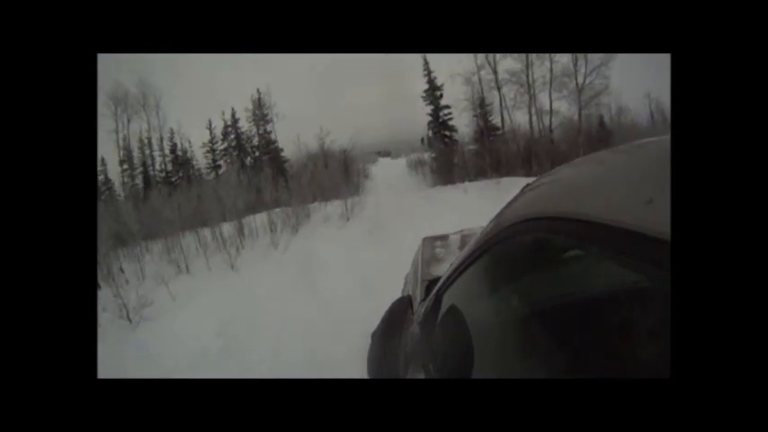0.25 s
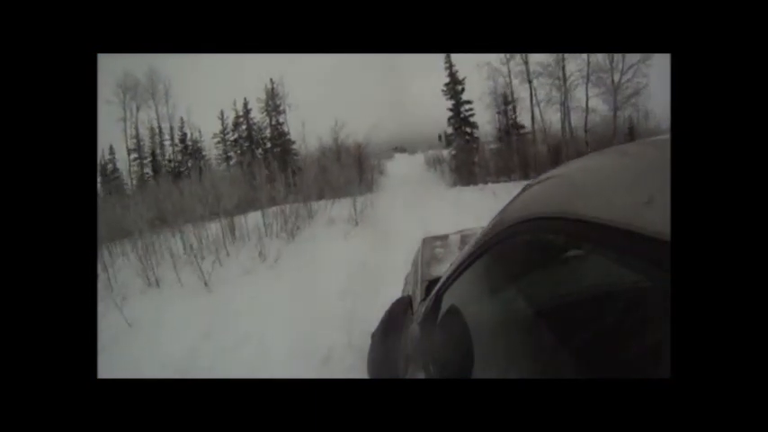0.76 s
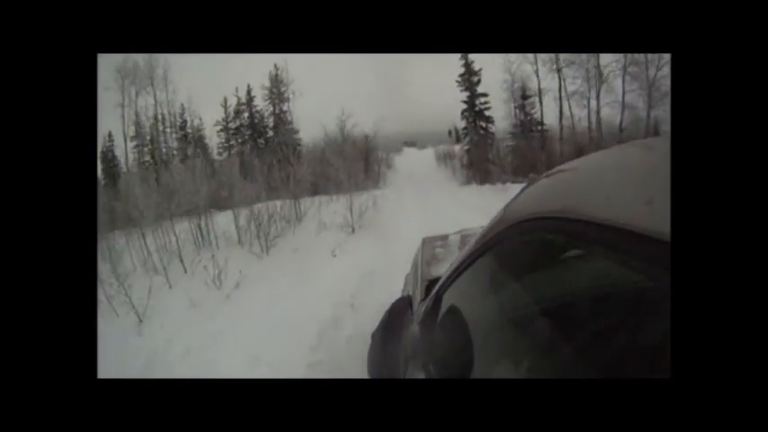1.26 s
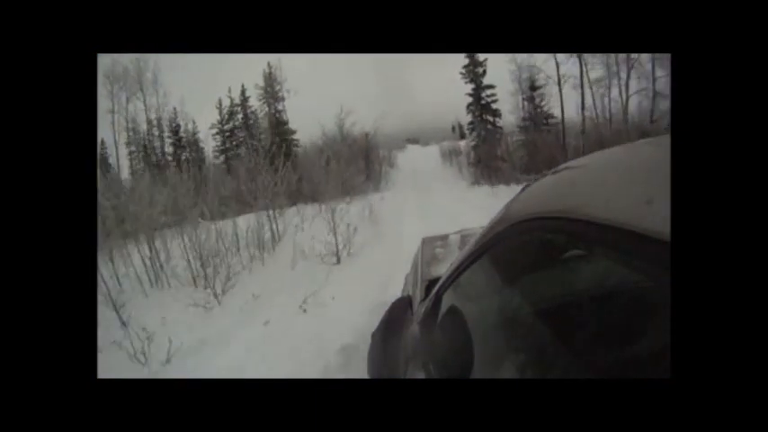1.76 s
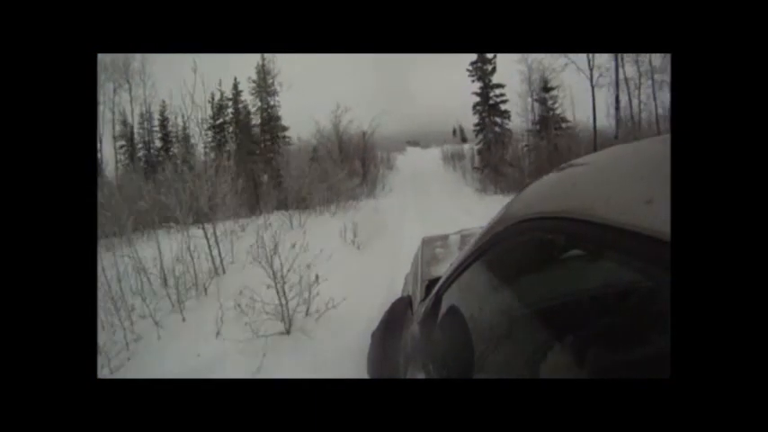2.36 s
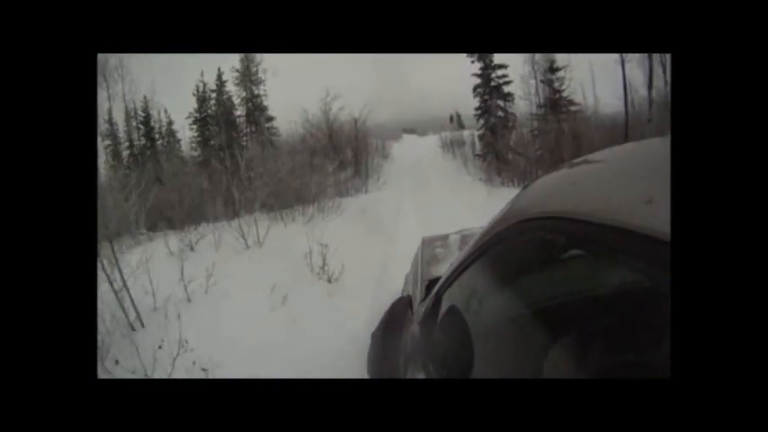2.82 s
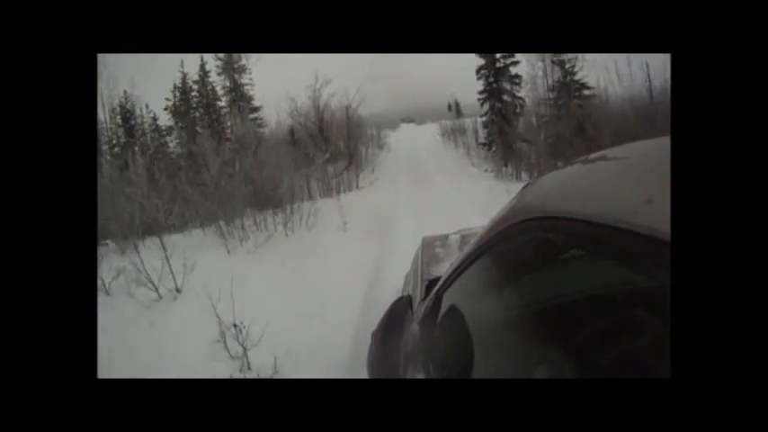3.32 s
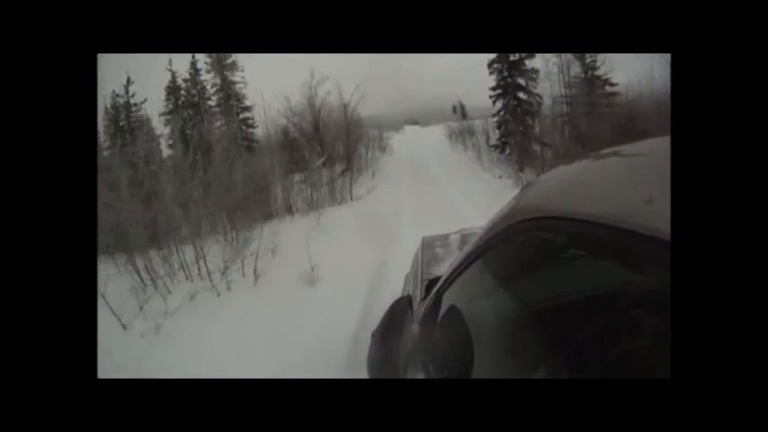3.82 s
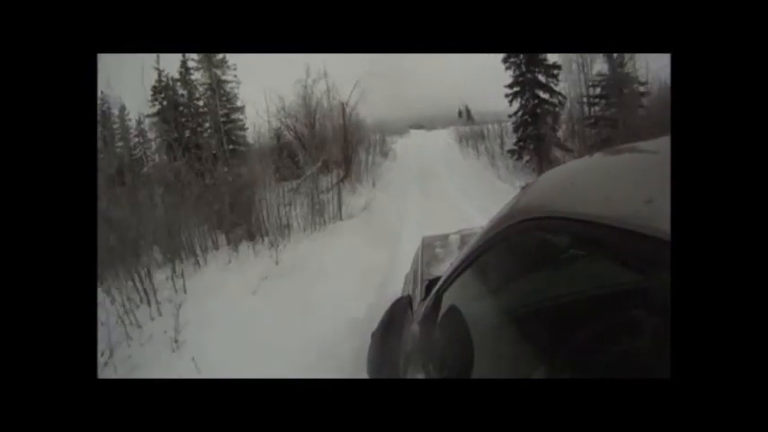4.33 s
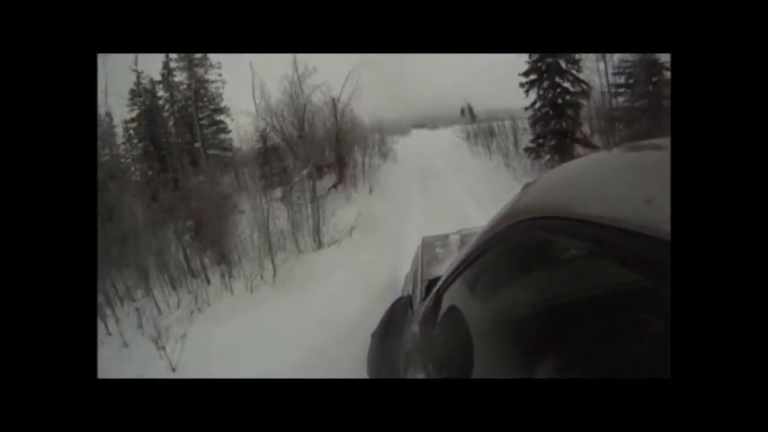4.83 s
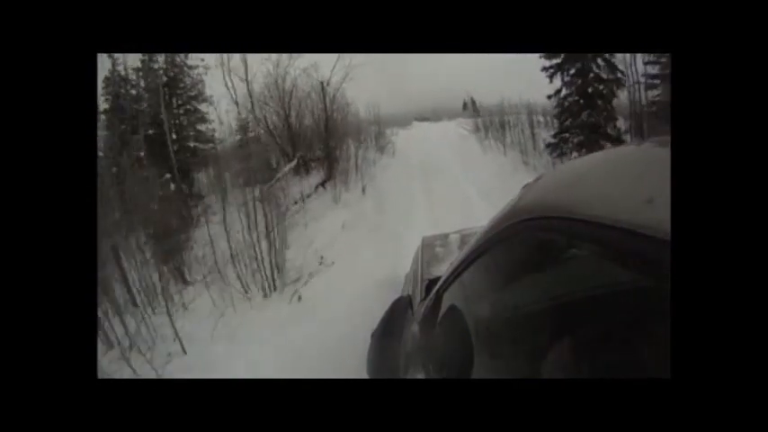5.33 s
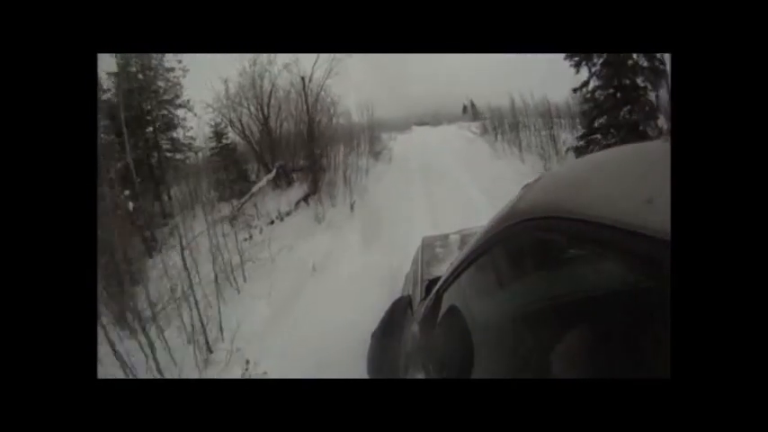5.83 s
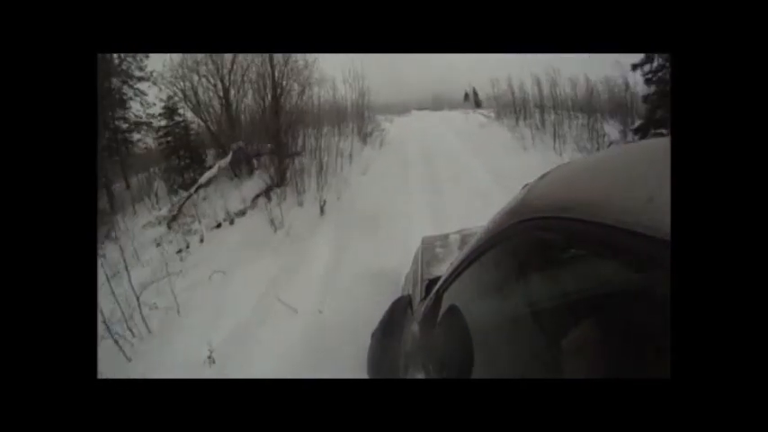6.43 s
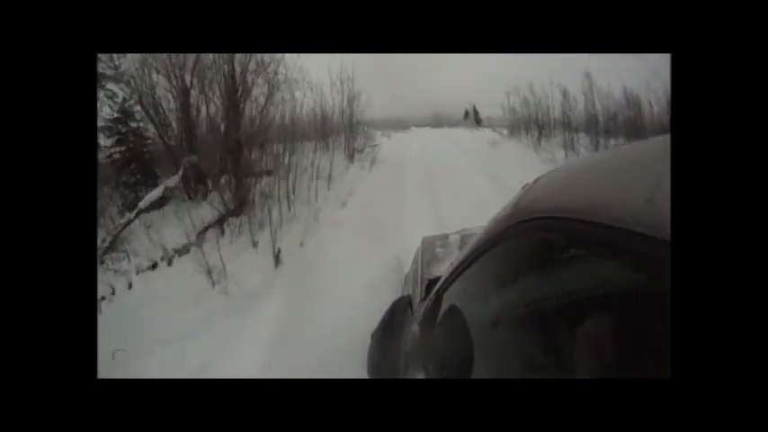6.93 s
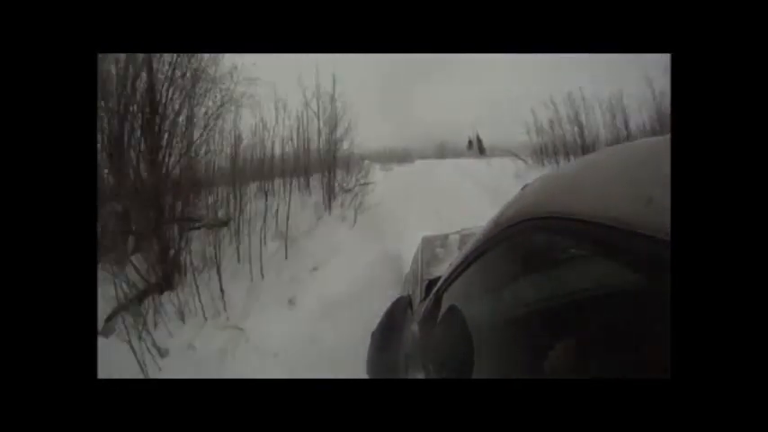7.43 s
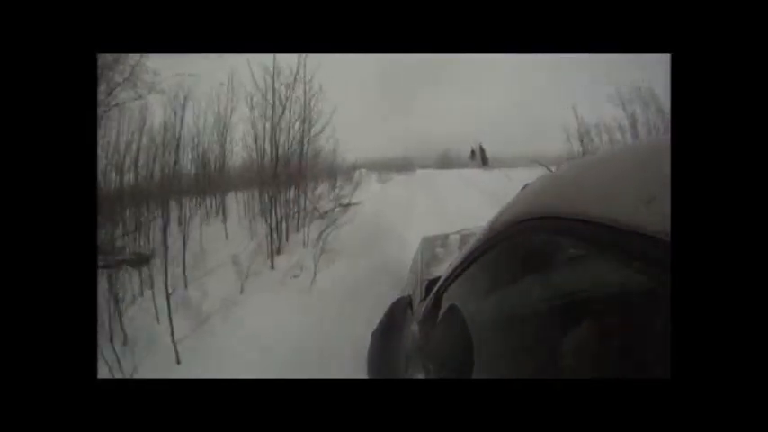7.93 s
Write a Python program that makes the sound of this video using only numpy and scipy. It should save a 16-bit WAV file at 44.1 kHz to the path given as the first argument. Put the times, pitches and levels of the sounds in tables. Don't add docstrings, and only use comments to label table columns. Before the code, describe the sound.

A continuous bassy track rumble dominates, throbbing and wavering as the truck crosses uneven snow. Small parts tick and knock, and the microphone's plastic case slaps its clip in gritty bursts. The middle is gentler, with soft chatter and small pings. The engine tone then climbs, a faint squeal passes, and the faster track shakes the case hard over a rough growl. Close, boxy, low-quality sound, with no room echo.

```python
import sys
import numpy as np
from scipy import signal
from scipy.fft import rfft, irfft
from scipy.io import wavfile
from scipy.ndimage import uniform_filter1d

SR = 44100
rng = np.random.default_rng(int(sys.argv[2]) if len(sys.argv) > 2 else 0)


def to_wav(sig):
    pcm = np.clip(np.atleast_2d(sig), -1, 1) * 32767
    pcm = np.round(pcm).astype(np.int16)
    wavfile.write(sys.argv[1], SR, pcm.T)


def rack_gain(trim_db):
    fader = np.asarray(trim_db, float)
    return 10 ** (fader / 20)


N = 360297

# t/s, lug rate f/Hz, load level on the sprocket/dB
TRACK_DRIVE = [(0.0, 38.07, -39.5), (.36, 39.3, -24), (.6, 41.67, -43), (.66, 45.98, -37),
               (1.139, 48.54, -38.5), (1.449, 51.9, -42), (2.15, 48.17, -38.5), (2.5, 52.16, -36.5),
               (2.75, 50.44, -48.5), (3.05, 53.7, -61), (3.39, 56.92, -30.5), (4.16, 67.37, -30),
               (5.0, 67.19, -35), (5.721, 65.5, -39.5), (7.03, 77.9, -34), (7.16, 84.7, -31.5),
               (7.499, 83.77, -26), (8.17, 86.54, -43)]


def in_time(rows):
    s, *columns = np.transpose(rows)
    return [np.interp(np.arange(N) / SR, s, c) for c in columns]


def rms_one(x):
    return x / np.sqrt(np.mean(x ** 2) + 1e-20)


def drift(rate):
    r = np.exp(-80 * np.pi * rate / SR)
    slow = signal.lfilter([1], [1, -2 * r, r * r], rng.standard_normal(N // 40 + 2002))[2000:]
    return np.interp(np.arange(N) / 40, np.arange(len(slow)), rms_one(slow - slow.mean()))


def resonance(x, hz, width_hz):
    r = np.exp(-np.pi * width_hz / SR)
    numerator = np.array([1, 0, -1]) * (1 - r * r) / 2
    return signal.lfilter(numerator, [1, -2 * r * np.cos(2 * np.pi * hz / SR), r * r], x)


def ring(clicks, hz, t60):
    r, w = rack_gain(-60 / (t60 * SR)), 2 * np.pi * hz / SR
    return signal.lfilter([0, np.sin(w)], [1, -2 * r * np.cos(w), r * r], clicks)


def tone(hz, db, wobble_db):
    phase = 2 * np.pi * (np.cumsum(hz) / SR + rng.random())
    return np.sqrt(2) * rack_gain(db + wobble_db * drift(5.4)) * np.sin(phase)


def strikes(rows):
    clicks = np.full(N, 1e-18)
    s, db = np.transpose(rows)
    np.add.at(clicks, np.round(s * SR).astype(int), rack_gain(db))
    return clicks


def bumps(rows, size):
    out = np.zeros(N // 50 + 2)
    t = np.arange(len(out)) * 50 / SR
    for s, height, half_s in rows:
        out += size(height) * np.exp(-((t - s) / half_s) ** 2)
    return np.interp(np.arange(N) / 50, np.arange(len(out)), out)


def swelling_db(rows, rest_db):
    return 20 * np.log10(rack_gain(rest_db) + bumps(rows, rack_gain))


def through_case(x, column):
    # f/Hz, width/Hz, level/dB for outside noise (column 2), level/dB for buzz (column 3)
    case_modes = [(298, 49, 5.5, -3.5), (436, 131, 2.5, -10), (730, 179, 1, -16), (1060, 67, -0.5, -53),
                  (1299, 156, -2.5, -13.5), (1662, 140, -5.5, -8.5), (2110, 263, -1, -7),
                  (2718, 217, -3.5, -34), (2990, 390, -5.5, -11.5), (3570, 208, -4.5, -6),
                  (3788, 112, -4, -6.5), (4977, 1410, -8, 0.5), (5534, 1290, -7, 3.5),
                  (5700, 2300, -26.5, -10)]
    out = 0
    for k, row in enumerate(case_modes):
        out = out + (-1) ** k * rack_gain(row[column]) * resonance(x, row[0], row[1])
    return out


def scuff(clicks, t60):
    swell = signal.lfilter([.1], [1, -.9], clicks)
    grind = signal.lfilter([1], [1, -rack_gain(-60 / (t60 * SR))], swell) * rng.standard_normal(N)
    click = rack_gain(15) * np.roll(clicks, 12) * rng.choice([-1, 1], N)
    return click + .6 * grind


def outside():
    # t/s, level/dB
    spray = [(0.0, -65.5), (.95, -63.5), (1.8, -65), (2.16, -64.5), (2.5, -65), (3.23, -65.5),
             (3.55, -62.5), (4.14, -63), (4.39, -63), (4.8, -64), (5.8, -63), (6.83, -61), (7.5, -59.5),
             (8.0, -58.5), (8.17, -59)]
    # t/s, level of the tick rate/dB
    looseness = [(0.0, 12), (.3, 1.5), (.55, -8), (.8, 3), (1.3, -5), (1.6, 4.5), (2.0, .1), (2.4, -6),
                 (2.9, -1), (3.3, -1), (4.0, 0), (4.7, -0.5), (5.2, -2.5), (5.7, 4), (6.3, 1), (6.8, 1),
                 (7.3, 1), (8.17, 4)]
    # t/s, level above an ordinary tick/dB
    loud_ticks = [(.2169, 14), (.414, 17), (.68, 23), (.69, 14), (.7876, 16), (.8, 14), (2.009, 22),
                  (1.99, 17), (2.183, 17), (2.2, 13), (2.224, 23), (.099, 12), (1.5374, 12), (1.972, 7),
                  (2.1181, 19), (2.3271, 12), (2.4853, 7), (2.9038, 17), (3.2954, 18), (3.312, 19),
                  (3.3328, 23), (3.342, 11), (3.3947, 21), (3.6536, 13), (3.7199, 8), (4.6788, 21),
                  (5.1307, 16), (6.0277, 17)]
    low_db, = in_time(spray)
    high_db = -65 + .65 * (low_db - low_db.mean())
    ticks_per_s = 90 * rack_gain(in_time(looseness)[0] + 2.3 * drift(5))

    hiss = through_case(rng.standard_normal(N), column=2)
    low = rms_one(signal.sosfilt(signal.butter(4, 1550, "low", fs=SR, output="sos"), hiss))
    high = rms_one(signal.sosfilt(signal.butter(4, 1550, "high", fs=SR, output="sos"), hiss))
    gust = drift(3.7)
    low = rack_gain(low_db + 0.22 * gust + 0.35 * drift(40)) * low
    high = rack_gain(high_db + 0.76 * gust + 0.86 * drift(49)) * high
    flutter = rack_gain(high_db - 11 + 5.8 * drift(28)) * rms_one(resonance(hiss, 2216, 500))

    tick_sizes = rack_gain(4.0 * np.minimum(rng.exponential(1, N), 2.5))
    ticks = (rng.random(N) < ticks_per_s / SR) * tick_sizes + strikes(loud_ticks)
    ticking = rack_gain(high_db + 7.0) * through_case(scuff(ticks + 1e-18, t60=0.012), column=2)
    return flutter + low + high + ticking


def engine():
    # t/s, f/Hz, level/dB
    firing = [
        (4.2, 169, -70),
        (4.5, 167, -56),
        (5.3, 164, -58),
        (5.6, 165.5, -56),
        (5.9, 170.5, -54),
        (6.2, 175.5, -55),
        (6.65, 179, -56),
        (6.8, 182, -64),
        (7.2, 187, -60),
        (8.1, 191, -60),
    ]
    # t/s, f/Hz, level/dB
    belt = [
        (5.8, 4900, -92),
        (6.05, 5000, -82),
        (6.22, 5070, -75),
        (6.35, 5110, -80),
        (6.55, 5150, -86),
        (6.98, 5010, -88),
        (7.04, 5050, -77),
        (7.14, 5130, -77),
        (7.2, 5150, -100),
    ]
    hz, db = in_time(firing)
    t = np.arange(N) / SR
    whine_db = np.interp(t, [5.5, 5.75, 6.2, 6.65, 6.75], [-95, -75, -73.5, -72, -100])
    whine_db = whine_db - 14 * np.exp(-((t - 6.36) / .04) ** 2)
    whine = tone(6.14 * hz + 5 * drift(14), whine_db, wobble_db=1.2)

    upper_db = np.interp(t, [7.0, 7.25, 7.9, 8.17], [-90, -73, -72, -73])
    lower_db = np.interp(t, [5.6, 5.7, 5.88, 5.97, 6.06, 6.2, 6.3], [-95, -73, -73, -90, -73, -72, -95])
    hum = tone(1268 + 5 * drift(4), upper_db, wobble_db=1.5)
    hum = hum + tone(765 + 3 * drift(4), lower_db, wobble_db=2.5)

    whistle_hz, whistle_db = in_time(belt)
    breath_db = 2 + 1.5 * drift(25)
    whistle = tone(whistle_hz * (1 + .007 * drift(120)), whistle_db + breath_db, wobble_db=1.5)
    return tone(hz, db, wobble_db=-2.5) + whine + hum + whistle


def frame():
    # t/s, level/dB, half length/s
    frame_jolts = [(1.6, -46, 0.18), (3.25, -52, .2), (3.75, -48, .15), (4.05, -50, 0.098),
                   (4.65, -47, 0.16), (5.5, -51, .1), (6.2, -44.5, 0.091), (6.6, -52, 0.079),
                   (6.95, -49, 0.12), (7.25, -45, .12), (7.65, -48, .1), (8.15, -47, 0.098)]
    return tone(40 + 1.62 * drift(7.4), swelling_db(frame_jolts, rest_db=-66), wobble_db=3.0)


def growl():
    # t/s, level/dB
    roughness = [
        (6.9, -76),
        (7.25, -73),
        (7.5, -63),
        (7.7, -70),
        (7.9, -68),
        (8.17, -66),
    ]
    hz, db = in_time(TRACK_DRIVE)[0], in_time(roughness)[0]
    lines = 0
    for k in (3, 5):
        lines = lines + tone(k * hz * (1 + 0.0081 * drift(11.0)), db - 5.5 + 4.4 * drift(14), wobble_db=1.0)
    rough = rng.standard_normal(N) * rack_gain(3.5 * drift(30))
    cab = resonance(rough, 250, 60) - 0.96 * resonance(rough, 520.0, 160) + 0.99 * resonance(rough, 784, 82)
    return lines + rack_gain(db) * rms_one(cab)


def knocks():
    # t/s, peak level/dB
    door_blows = [
        (0.145, -41),
        (1.476, -39.5),
        (2.541, -54),
        (2.801, -39),
    ]
    # f/Hz, level/dB, t60/s
    door_modes = [(341, -3.5, 0.15), (585, -1, 0.12), (620, 1.5, 0.065), (800, -16, 0.087),
                  (1076, 4.5, 0.067), (1380, -26, .04)]
    # t/s, peak level/dB, f/Hz
    latch_bumps = [
        (1.335, -55, 740),
        (1.993, -61, 750),
        (2.662, -61, 700),
        (3.317, -58.5, 760),
        (3.395, -63, 800),
    ]
    # t/s, peak level/dB, f/Hz
    pings = [(.415, -59, 2730), (.68, -55, 2110), (.79, -57, 2080), (1.538, -61, 1970), (1.53, -60, 2640),
             (2.903, -59, 2680), (2.904, -59, 2170), (2.849, -64, 2230), (2.813, -56, 2140),
             (3.396, -56, 2000), (3.556, -54, 1880), (3.603, -51, 1940), (3.655, -54, 1950),
             (3.693, -57, 2040), (3.881, -51, 1997), (4.32, -57, 2050), (4.35, -54, 1920),
             (4.441, -57, 2000), (4.452, -53, 2110), (4.468, -55, 2120), (4.497, -60, 2030),
             (4.875, -61, 1990), (5.303, -48.5, 1953), (5.345, -56, 1913), (5.391, -54, 1960)]
    clicks = strikes(door_blows)
    rough = 1.3 + .7 * rng.standard_normal(N)
    blows = signal.lfilter([.045], [1, -.955], clicks) * rough
    upper_lag = int(0.00555 * SR)
    door = 0
    for hz, db, t60 in door_modes:
        door = door + rack_gain(db - 5.5) * ring(np.roll(blows, upper_lag * (hz > 900)), hz, t60)
    shudder = signal.lfilter([1], [1, -rack_gain(-60 / (0.07 * SR))], clicks) * rng.standard_normal(N)
    band = signal.butter(2, [450, 1500], "band", fs=SR, output="sos")
    door = door + rack_gain(-16.0) * signal.sosfilt(band, shudder)

    latch = 0
    for s, db, hz in latch_bumps:
        latch = latch + ring(strikes([(s, db), (s + 0.00276, db + 8)]), hz, t60=0.036)
        latch = latch + ring(strikes([(s + .01, db + 9)]), .81 * hz, t60=.04)
        latch = latch + ring(strikes([(s + .012, db - 5)]), 1.4 * hz, t60=.04)
    latch = rack_gain(-6) * signal.lfilter([.2], [1, -.9], latch)

    lid_pings = 0
    for s, db, hz in pings:
        lid_pings = lid_pings + ring(strikes([(s, db)]), hz, t60=0.071)
        lid_pings = lid_pings + 0.22 * ring(strikes([(s + 0.00188, db)]), 0.97 * hz, t60=0.023)
    return door + latch + lid_pings


def buzz():
    # t/s, peak level/dB
    case_slaps = [(0.0398, -59), (0.0441, -52), (0.0504, -57), (0.0567, -52.5), (0.0606, -56), (0.0999, -39.5),
                  (0.6798, -53), (0.9331, -57), (0.9612, -42), (0.9657, -38), (0.9697, -43), (0.9824, -48.0),
                  (1.0314, -38), (1.044, -37), (1.0468, -48), (1.0545, -37), (1.0628, -37), (1.0671, -36),
                  (1.0703, -42.5), (1.0807, -36), (1.0846, -39), (1.0881, -35), (1.0936, -41), (1.1057, -51),
                  (1.1095, -35), (1.1172, -40.5), (1.128, -38), (1.1338, -41), (1.1455, -32.5), (1.1499, -36.5),
                  (1.1541, -45), (1.1908, -40.5), (1.1991, -39.5), (2.0364, -48), (2.1833, -45), (2.19, -48),
                  (2.2025, -42), (2.2237, -44), (2.2426, -44), (2.2573, -51), (2.2635, -44), (2.2957, -43),
                  (3.331, -60), (3.4208, -46), (3.453, -46), (3.5544, -42), (3.5865, -40.5), (3.613, -44),
             (3.6344, -38), (3.686, -45), (3.6929, -42), (3.8783, -45), (3.895, -41.5), (3.9416, -52),
             (3.9723, -44), (4.035, -48), (4.0491, -52), (4.1419, -50.5), (4.2448, -48.0), (4.2763, -38.5),
             (4.2918, -44), (4.3036, -46), (4.3507, -43), (4.3647, -38.5), (4.379, -44), (4.3945, -40),
             (4.4104, -43), (4.417, -41), (4.4254, -49), (4.438, -40), (4.4666, -39), (4.4846, -47),
             (4.4933, -43), (4.5433, -44), (5.7726, -48), (6.466, -46),
                  (7.1645, -32), (7.168, -30.5), (7.174, -30.5), (7.179, -31), (7.1884, -39), (7.205, -37),
            (7.2102, -32), (7.214, -30), (7.2241, -35), (7.391, -42), (7.4137, -37.5), (7.423, -33),
            (7.444, -32.5), (7.4473, -30), (7.4518, -52), (7.4624, -37), (7.4708, -33.5), (7.5282, -30),
            (7.5384, -40), (7.541, -42.5), (7.5492, -35), (7.5542, -46), (7.5713, -39), (7.574, -37.5),
            (7.5818, -37), (7.5847, -43), (7.604, -35), (7.6088, -30), (7.6141, -37), (7.6276, -36.0),
                  (7.6403, -36.5), (7.6458, -29.5), (7.6512, -34), (7.659, -36), (7.6638, -28), (7.6683, -34),
            (7.6757, -30), (7.684, -35), (7.6872, -35), (7.697, -35), (7.7232, -45), (7.7364, -33.5),
            (7.7598, -36.5), (7.7847, -36.5), (7.7952, -37.5), (7.8088, -37), (7.8137, -31.5),
            (7.8193, -34), (7.8297, -31), (7.8333, -36), (7.8374, -30.5), (7.8413, -28.5), (7.8516, -32),
            (7.8545, -29.5), (7.865, -29), (7.8769, -35), (7.885, -32.0), (7.889, -35), (7.924, -31),
            (8.0334, -38), (8.0427, -40)]
    s, db = np.transpose(np.array(case_slaps))
    calm = (s > 1.5) & (s < 7.0)
    softness = np.where(calm, 1., np.clip((-36 - db) / 12, 0, 1))
    slaps = strikes(np.c_[s, db - 3 * softness])

    lid_db = -52.5 + .62 * (db + 41.5) + 3 * rng.standard_normal(len(s))
    lid = ring(strikes(np.c_[s + 0.002846 * softness, lid_db]), 2055, t60=0.016)

    spread = uniform_filter1d(uniform_filter1d(slaps ** 2, size=900), size=900)
    unrest = np.sqrt(np.abs(spread) * 600)
    chatter_sizes = rack_gain(-20.0 + 1.9 * np.minimum(rng.exponential(1, N), 3))
    chatter = np.roll(unrest, shift=350) * (rng.random(N) < 350 / SR) * chatter_sizes

    gentle = np.c_[s, db + 2][softness > .5]
    thud = through_case(scuff(strikes(gentle) + 0.35 * chatter, t60=0.0085), column=2)

    counts = strikes(np.c_[s, 0 * db])
    shaking = uniform_filter1d(uniform_filter1d(counts, size=3500), size=3500) * 1000
    fizz = rack_gain(-67.5 + 3.7 * drift(60)) * np.sqrt(np.abs(shaking)) * rng.standard_normal(N)
    return rack_gain(7.0) * through_case(scuff(slaps + chatter, t60=0.0061) + fizz, column=3) + lid + thud


def body():
    # t/s, level/dB, half length/s
    sways = [(.1, -45, 0.056), (.52, -41, 0.084), (1.02, -49, 0.073), (1.4, -43, 0.13), (1.66, -47, 0.057),
             (2.05, -55, .08), (2.45, -42, 0.19), (2.9, -46, 0.22), (3.15, -47, 0.18), (3.65, -44, 0.31),
             (4.1, -44, 0.19), (4.39, -37, .06), (4.8, -48, 0.17), (5.28, -38.5, 0.1), (5.62, -43, 0.073),
             (5.96, -49, 0.15), (6.5, -37, 0.074), (6.74, -34, 0.047), (6.92, -37, 0.075),
             (7.25, -41, 0.19), (7.58, -33.5, 0.076), (7.85, -40, 0.098), (8.12, -40, 0.18)]
    # t/s, level/dB, half length/s
    panel_jolts = [(.75, -46, .15), (1.09, -10, 0.096), (1.57, -24.5, 0.12), (1.78, -21, 0.094),
                   (2.32, -35, 0.13), (3.4, -42, 0.15), (4.12, -44, 0.13), (4.39, -44, .06),
                   (4.8, -44, .12), (5.42, -42, 0.11), (5.7, -45, 0.1104), (6.3, -41, 0.089),
                   (6.6, -42, 0.12), (7.15, -44.5, 0.37), (7.62, -32.5, 0.06), (8.05, -50, 0.16)]
    # t/s, level/dB, half length/s
    boom_jolts = [(.1, -41, 0.049), (.55, -38.5, 0.15), (.95, -44.5, 0.12), (1.2, -41, 0.053),
                  (1.5, -39.5, 0.1), (1.7, -49, 0.049), (2.05, -44.5, 0.15), (2.27, -37, 0.039),
                  (2.53, -34, 0.054), (2.95, -44, 0.076), (3.2, -52.5, 0.073), (3.67, -47.5, 0.045),
                  (3.9, -35.5, 0.092), (4.1, -45, 0.12), (4.39, -42, 0.053), (4.8, -25.5, 0.13),
                  (5.17, -18.5, 0.11), (5.54, -23, 0.048), (5.8, -29, .18), (6.62, -26, 0.058),
                  (6.83, -36, 0.061), (7.1, -41.5, 0.084), (7.58, -44, 0.045), (7.96, -36, 0.077)]
    # f/Hz, level per Hz/dB
    rumble_spectrum = [(8.2, -59), (14, -13.5), (49, 0), (82, -1), (152, -2.5), (171, -10), (221, -26.5),
                       (300, -25.5), (390, -52), (660, -120)]
    # t/s, level/dB
    terrain = [(0.0, 0.5), (.3, -1.5), (.7, 0), (1.2, 1), (1.7, -0.5), (2.1, 2), (2.6, -1.5), (3.0, 0),
               (3.4, -1), (4.0, 0.8), (4.5, 1), (4.9, .1), (5.3, -2), (5.8, -1.5), (6.4, 1), (7.0, -0.5),
               (7.6, -1.5), (8.17, -0.5)]
    modes = ((swelling_db(sways, rest_db=-65), 29, 5.0),
             (swelling_db(panel_jolts, rest_db=-48.5), 97, 3.0),
             (swelling_db(boom_jolts, rest_db=-52.5), 139, 2.2))
    second_hz = 2 * in_time(TRACK_DRIVE)[0]
    out = 0
    for db, hz, wander_hz in modes:
        sinking_db = -24 * np.exp(-((second_hz - hz) / 9) ** 2)
        out = out + tone(hz + wander_hz * drift(10.1), db - 3.5 + sinking_db, wobble_db=3.0)

    hz, db = np.transpose(rumble_spectrum)
    bins = np.arange(N // 2 + 1) * SR / N + 1e-3
    shape_db = np.interp(np.log(bins), np.log(hz), db, left=-90, right=-90)
    shape_db = shape_db - 5.5 * np.exp(-((bins - 117.8) / 6.9) ** 2)
    rumble = rms_one(irfft(rfft(rng.standard_normal(N)) * rack_gain(shape_db), N))
    return out + rack_gain(-42.5 + in_time(terrain)[0] + 1.1 * drift(6.6)) * rumble


def tracks():
    # t/s, level change/dB, half length/s
    hollows = [(0.0, -5, 0.037), (.262, -24, 0.036), (1.14, -3, 0.065), (1.39, -7, 0.059),
               (1.51, -22, 0.02), (1.76, -18, 0.13), (1.97, -5, 0.055), (2.36, -10, 0.064),
               (2.62, 5, 0.094), (2.95, -7, 0.084), (3.15, 7, 0.035), (3.81, -4, 0.019), (4.16, -5, 0.036),
               (4.57, -4.5, 0.074), (4.91, -13, 0.077), (5.4, -4.5, 0.13), (5.75, -5, 0.086),
               (6.16, -17, 0.036), (6.43, -6.5, 0.075), (6.86, -11.5, 0.14), (7.16, -5, 0.067),
               (7.262, -18, 0.014), (7.31, -7, 0.016), (7.43, -15.5, 0.019), (7.57, -6.5, 0.048),
               (7.65, -24, 0.056), (7.81, -42, 0.02), (8.14, -20, 0.033)]
    # t/s, level/dB, half length/s
    ridges = [(0.0, -43.5, 0.25), (.2, -57, 0.037), (.47, -48, 0.092), (.85, -36, 0.24), (1.1, -27, 0.11),
              (1.3, -43, 0.047), (1.56, -45, 0.15), (1.81, -34, 0.054), (2.0, -40, 0.11), (2.25, -39, 0.12),
              (2.38, -53, 0.056), (2.63, -35.5, 0.024), (2.74, -45, 0.051), (3.0, -49, 0.034),
              (3.39, -48, 0.098), (3.85, -46, 0.014), (3.92, -39, 0.018), (4.05, -36.5, 0.087),
              (4.24, -40, 0.031), (4.38, -32, 0.057), (4.7, -36, 0.12), (5.03, -38, 0.11),
              (5.64, -38, 0.081), (5.88, -36.5, 0.048), (6.03, -38.5, 0.11), (6.26, -40, 0.084),
              (6.6, -53, 0.2), (7.03, -54, 0.043), (7.38, -47.5, 0.06), (7.92, -51.5, 0.049)]
    hz, load_db = in_time(TRACK_DRIVE)
    first_db = load_db + bumps(hollows, float)
    second_db = swelling_db(ridges, rest_db=-55.5)
    hz = hz * (1 + 0.0039 * drift(4.25))
    smooth_db = uniform_filter1d(first_db, size=9000)
    floor_db = 21.5 * np.exp(-((3 * hz - 153.4) / 8) ** 2)
    third = tone(3 * hz, smooth_db - 34 + floor_db, wobble_db=3.5)
    fourth = tone(4 * hz, smooth_db - 42, wobble_db=3.5)
    return tone(hz, first_db, wobble_db=2.0) + tone(2 * hz, second_db, wobble_db=2.0) + third + fourth


def scene():
    return (outside() + engine() + frame() + growl() + knocks() + buzz() + body() + tracks())[None]


def low_pass(x):
    return signal.sosfilt(signal.butter(12, 12810, fs=SR, output="sos"), x)


def record(dry):
    edge = signal.cheby2(6, 17, 5990, fs=SR, output="sos")
    filtered = signal.sosfilt(edge, dry)
    slow = signal.resample_poly(filtered, 40, 147, axis=1, window=("kaiser", 0.), padtype="edge")
    held = np.repeat(slow, 4, axis=1)
    out = signal.resample_poly(held, 147, 160, axis=1, padtype="edge")[:, :N]
    out = signal.sosfilt(signal.ellip(10, .2, 60, 12800, fs=SR, output="sos"), out)
    out = np.pad(out, ((0, 0), (0, N - out.shape[1])), "edge")
    return low_pass(out)


dry = scene()
out = record(dry)
to_wav(out)
```